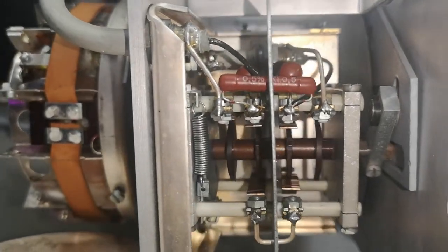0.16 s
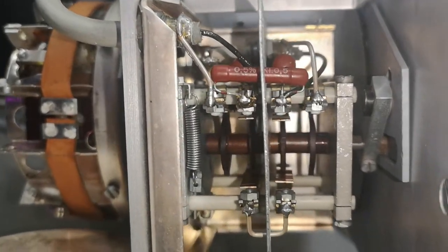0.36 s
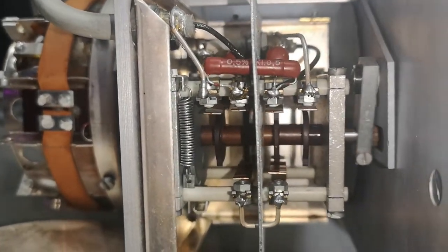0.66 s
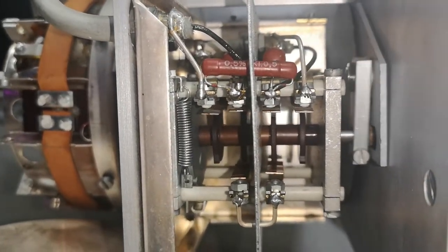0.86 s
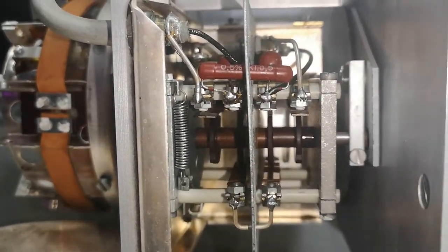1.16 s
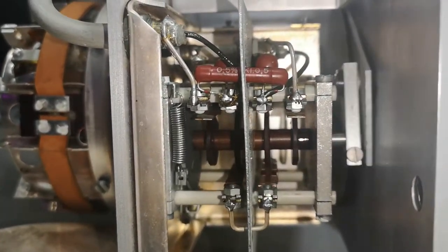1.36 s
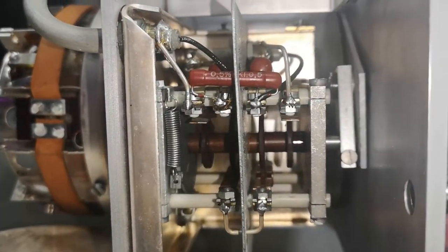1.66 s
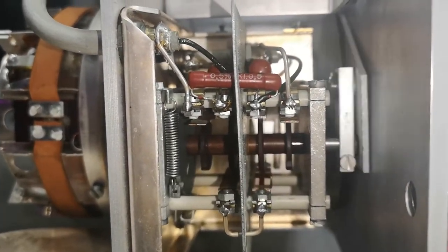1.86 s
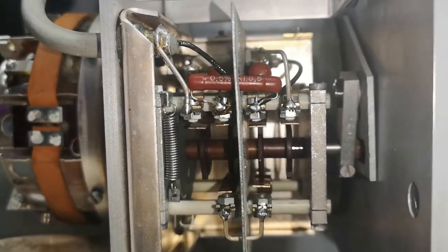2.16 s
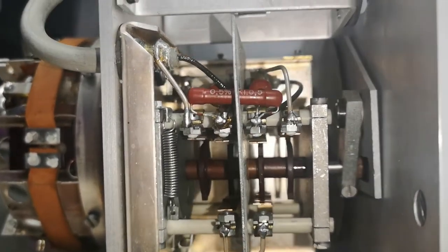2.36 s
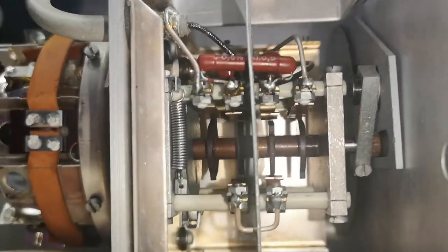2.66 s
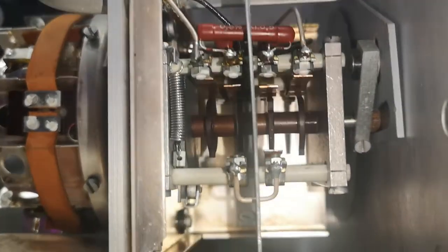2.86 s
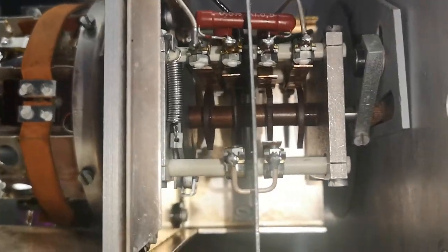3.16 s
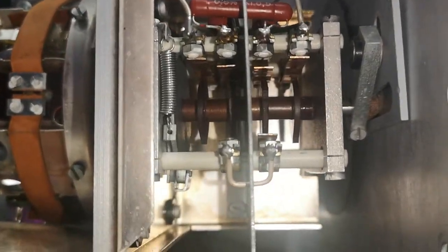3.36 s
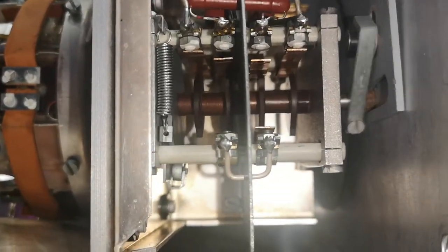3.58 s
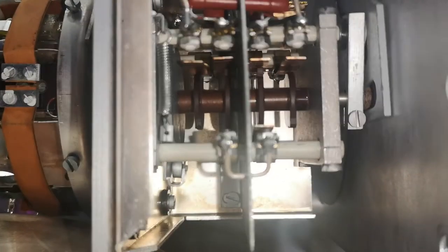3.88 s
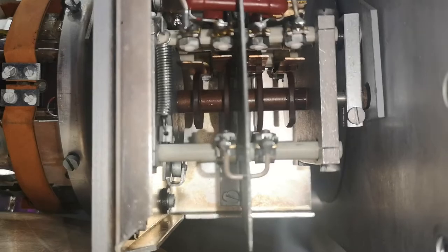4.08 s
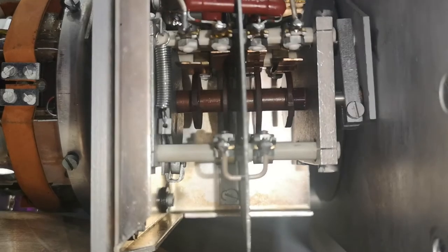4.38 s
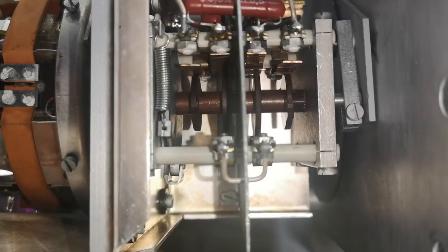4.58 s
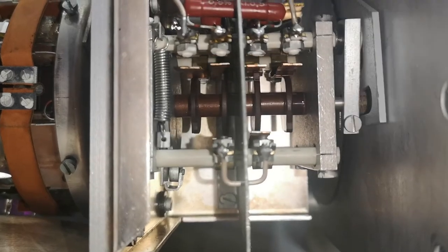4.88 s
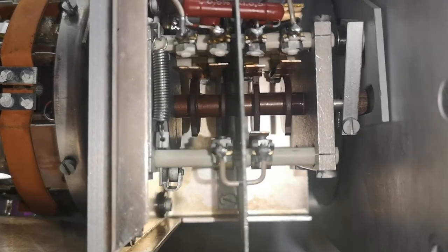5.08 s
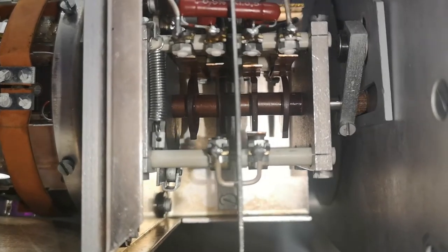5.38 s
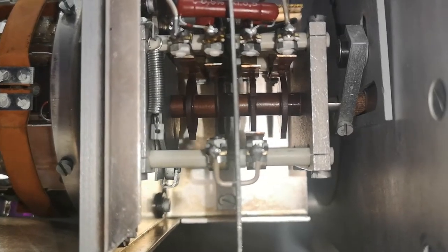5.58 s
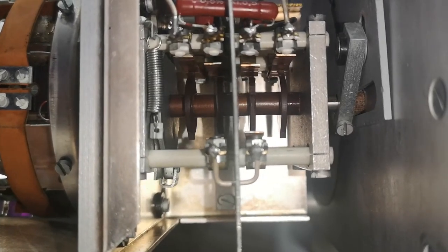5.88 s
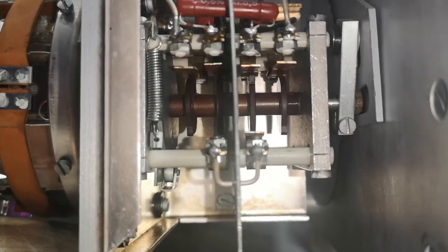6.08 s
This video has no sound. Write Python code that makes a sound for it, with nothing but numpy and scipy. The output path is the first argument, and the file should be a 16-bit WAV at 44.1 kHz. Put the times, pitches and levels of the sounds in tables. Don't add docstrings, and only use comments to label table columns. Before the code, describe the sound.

Close phone microphones catch a metal switch stepping through notches. Opening ring dies under small double clicks; a loud clank lands, then rubbing and chatter, then three more clanks about a second apart, the last also ringing brightly. Loose plates buzz shortly and a coil spring sings on. Short metallic chassis echo, quiet workshop air, low mains hum and dull hand rumble.

```python
import sys
import numpy as np
from scipy import signal
from scipy.fft import rfft, irfft, next_fast_len
from scipy.io import wavfile
from scipy.ndimage import uniform_filter1d, map_coordinates

SR = 44100
rng = np.random.default_rng(int(sys.argv[2]) if len(sys.argv) > 2 else 0)


def elevation(decibels):
    levels = np.asarray(decibels, float)
    return 10 ** (levels / 20)


def digitize_waveform(pressure):
    field = np.atleast_2d(pressure).T
    bounded = np.clip(field, -1, 1)
    quanta = np.round(bounded * 32767).astype(np.int16)
    wavfile.write(sys.argv[1], SR, quanta)


N = 274743

# start in seconds, blow in dB, thud in dB, ringing in dB,
# time in seconds when the next cam takes up the spring.
DETENTS = [
    (-.064, -12, -46, -35, 0.28),
    (1.5865, -10, -24.5, -35.5, 2.9),
    (3.2997, -11.5, -37, -29, 5.13),
    (4.5926, -10, -29, -35, 5.07),
    (5.6627, -13.5, -42, -29, 5.9),
]
# delay in seconds, level in dB,
# brightness in dB, panel boom in dB, t60 in seconds.
BOUNCES = [
    [(0, -8, -8, -24, 0.03), (.0035, -3.5, -10.5, -20, 0.045), (.009, -1.5, -10.5, -12.5, 0.028),
     (0.0146, -7.5, -2, -19.5, 0.026), (0.025, -13.5, -20, -19.5, .04)],
    [(0, -2.5, -10.5, -22.5, .023), (.003, 0.5, 3, -9.5, 0.022), (.007, -1.5, -4, -30.5, 0.017),
     (.012, -4.5, -8.5, -23.5, 0.028), (.02, -12.5, -14.5, -27.5, 0.065)],
    [(.001, -8.5, -12.5, -26, 0.037), (.0045, -4.5, -6.5, -20.5, 0.047), (.0115, -0.5, -8.5, -12.5, 0.026),
     (0.015, -5.5, -4, -18.5, .025), (0.025, -13, -19.5, -18, 0.05)],
    [(0, 3, -14, -20, 0.02), (.003, 0, 4.5, -14, 0.022), (.007, 2, -2.5, -24, 0.012),
     (.012, -8.5, -4, -28, 0.036), (.02, -13.5, -11, -29, 0.12)],
]
# start in seconds, level in dB, brightness in dB.
BLADE_BLOWS = [(0.209, -36, 1), (0.212, -34.5, -1.5), (0.221, -49, -5), (0.2388, -41.5, -7),
               (0.348, -42, 10), (0.351, -37.5, -13), (0.355, -35, -5), (0.3588, -34.5, -10),
               (0.369, -40.5, -10), (0.3733, -40, -13), (0.4105, -53, -7), (0.6369, -43, -11),
               (0.6394, -40, -2), (0.6477, -34, -9.5), (0.655, -44.5, -4), (0.66, -44.5, -11),
               (0.67, -42, -13), (0.687, -47, -13), (1.0853, -61, -17), (2.1345, -43.5, 4),
               (2.138, -36.5, -4.5), (2.144, -38.5, -4), (2.147, -40, -4), (2.154, -36.5, -7),
               (2.1599, -37, -9), (2.166, -37, -13), (2.176, -44, -15), (2.181, -42, -12),
               (3.6646, -40.5, -20.5), (3.691, -60, -13), (3.835, -38, 2), (3.8381, -36, -9),
               (3.848, -35.5, -7), (3.853, -34.5, -5), (3.858, -36.5, -5), (3.865, -35, -5.5),
               (3.872, -37.5, -13), (3.878, -40, -4), (4.1938, -48.5, -30), (5.0773, -41, -2),
               (5.086, -30.5, 0.5), (5.095, -34.5, 1), (5.1044, -34, 1), (5.113, -33, -8), (5.117, -34, -4),
               (5.126, -37.5, -6), (5.136, -39.5, -16), (6.006, -43, -16), (6.201, -33.5, 0),
               (6.207, -33, -8), (6.215, -37.5, -5), (6.222, -36.5, -3)]
# start in seconds, t60 of its blows in seconds, thud in dB, boom in dB.
TRIPS = [(0.206, 0.047, -26, -31), (.347, 0.043, -19, -22), (.632, 0.046, -18.5, -21),
         (1.085, 0.076, -16, -5.5), (2.133, 0.031, -21, -20.5), (3.664, 0.066, -29, -8),
         (3.834, 0.042, -28, -16), (4.191, 0.061, -11, -9.5), (5.077, 0.037, -20.5, -27),
         (6.005, 0.085, -23, -8), (6.2, 0.053, -43, -14.5)]
# start in seconds, end in seconds, level in dB, brightness in dB.
RUBS = [
    (0.542, 0.599, -77.5, 12),
    (2.043, 2.117, -67, 2),
    (2.116, 2.142, -36.5, -9),
    (3.648, 3.669, -47.5, -20),
    (3.79, 3.843, -53.5, -4),
    (4.415, 4.449, -82, -1.5),
    (5.015, 5.06, -67, 3),
    (5.063, 5.083, -42, -9),
    (6.138, 6.205, -63, 0),
]
# start in seconds, peak in dB, brightness in dB, t60 in seconds.
SLACK_TICKS = [(1.41, -85, 16.5, .08), (1.5575, -74.5, 28.5, 0.041), (1.576, -55, 2.5, 0.062),
               (2.0037, -60, 0.5, 0.19), (2.0406, -71, -3.3, .05), (2.39, -63, -8, 0.073),
               (2.896, -62.5, 0.5, 0.31), (2.9683, -61.5, -1.5, 0.047), (3.1915, -58, -2, 0.044),
               (3.8999, -47, -19, .055), (4.435, -65, -19.5, .08), (4.465, -58.5, 1, .027),
               (4.574, -55.5, 8, 0.043), (4.581, -57, 10.5, 0.044), (4.997, -65, 0, 0.077),
               (5.338, -58, -3.5, 0.079), (5.5541, -62, 20.5, 0.067), (5.9175, -55, -6.5, 0.26)]
# start in seconds, pitch in Hz, level in
# dB, t60 in seconds.
FLICKED_PARTS = [(-.05, 113, -32, 0.43), (-.05, 288, -44, 0.26), (.4, 504, -58, 0.81),
                 (.545, 5600, -66, 0.6), (1.556, 7100, -47.5, 0.034), (2.002, 5000, -46, 0.019),
                 (2.042, 5100, -53.5, .12), (2.135, 5300, -26, 0.059), (2.151, 2700, -28.5, 0.13),
                 (2.17, 370, -53.5, 0.42), (3.847, 2680, -35.5, 0.27), (5.105, 2627, -33.5, 0.18),
                 (5.19, 1950, -55, 0.14), (2.967, 8000, -67, 0.087), (3.791, 8300, -61, 0.079),
                 (3.79, 5000, -57, 0.092), (4.193, 2240, -41.5, 0.062), (4.2, 2780, -54, .12),
                 (4.467, 8960, -54, 0.046), (4.472, 2700, -62.5, 0.14), (5.137, 1034, -56, 0.64),
                 (5.921, 5600, -57, 0.1), (5.918, 8050, -57.5, 0.14), (6.023, 489, -57, 0.81),
                 (.211, 2320, -31, 0.086), (.211, 2960, -38, .1), (.211, 4530, -32, .05),
                 (.211, 5000, -31, 0.05), (0.21, 5480, -35, .05), (.356, 2524, -29, .1),
                 (0.351, 5230, -33, 0.08), (.648, 2370, -39, 0.11), (.648, 7400, -39, 0.056),
                 (5.087, 4900, -30, .08), (3.665, 2400, -43, 0.16), (6.006, 2500, -46, 0.11),
                 (5.665, 5080, -24, .04), (5.665, 5670, -28, .04), (2.9, 2770, -64, .07),
                 (3.19, 2800, -68.5, 0.079), (4.605, 756, -50.5, 0.52)]

SPRING_HZ = [491, 424, 1470]
COILS_HZ = [1954, 1967, 1946]
LOW_PLATE_HZ = [2422, 2498, 2600, 2701, 2895, 3349, 3812, 4253, 4390, 4636, 4867]
HIGH_PLATE_HZ = [5085, 5268, 5464, 5875, 6430, 6543, 6840, 7405, 7822, 7908, 8059, 8350, 8538, 9340]
# t60 in seconds, then level in dB
SPRING_MODES = [(1.26, -3, -3, -4.5, 1.0, -4), (0.21, -3, -5.5, -3, -22, -14),
                (0.38, -21, -19, -38.5, -25, -19.5)]
COIL_MODES = [(1.4, -6.0, 1, -6, -12, -9.5), (2.2, -15.5, -6, -24, -4.5, -24),
              (1.4, -7, -8.5, -13, -10.5, -7.5)]
PLATE_MODES = [(0.6, -13.5, -3, -19, -6.5, -13.5), (0.52, -55.5, -10.0, -47.5, -38, -51),
               (0.21, -32.0, -24.5, -5.5, -9, -25), (0.34, -20, -21.5, -13, -6, -15),
               (0.45, -15, -45, -17.5, -15.5, -9.5), (0.4, -17, -42, -10, -47, -21),
               (0.55, -28, -17.5, -16.5, -41.5, -20), (0.25, -34.5, -8, -15.0, -40.5, -23),
               (0.55, -19, -26, -17.5, -18.5, -30), (0.4, -32, -22, -15, -43, -21),
               (0.3, -40.0, -24, -35, -33, -24),
               (0.45, -38.5, -18.5, -31.5, -23.5, -45), (0.59, -52, -14, -21.0, -23.5, -49.0),
                (0.25, -30.0, -14.5, -12.5, -37.5, -17), (0.55, -56.0, -32.0, -18.5, -27.5, -56),
                (0.3, -31.0, -16, -16.0, -35.5, -48), (0.4, -51.5, -31.0, -14.5, -25.5, -33),
                (0.3, -26, -31, -34.5, -33.5, -12), (0.4, -35, -49.0, -41.0, -46.0, -33),
                (0.25, -24.0, -34.5, -14.0, -34, -6.5), (0.45, -35.5, -28.5, -13.5, -14, -11),
                (0.51, -55.0, -22, -20.0, -40.5, -28), (0.4, -11.5, -56.5, -19.5, -24, -22),
                (0.3, -42.0, -31, -19.0, -36, -29.5), (0.52, -46.5, -37.5, -21.5, -46.0, -22)]

# pitch in Hz, level in dB, t60 in seconds.
CASE_MODES = [(113, 0.5, 0.38), (160, -9, 0.35), (191.5, -8.5, 0.24), (312, -6.5, 0.049)]
# pitch in Hz, width in Hz, level in dB.
FRAME = [(1713, 1100, -10.5), (1918, 249, 3), (2505, 220, 1.5), (2700, 80, 7), (3500, 2100, -7.5)]
# pitch in Hz, width in Hz, level in dB.
SHELL = [(4470, 33, -9), (5100, 1100, 5), (5300, 9.7, 8), (6880, 780, -10), (7600, 810, -3.5),
         (8300, 120, 3.5), (8320, 1800, -1), (13300, 4700, -15)]
# pitch in Hz, width in Hz, level in dB.
PANELS = [(244, 320, -3.5), (426, 108, 7.5), (866, 100, -13.5)]
# pitch in Hz, t60 in seconds.
ECHO_T60 = [(300, 0.45), (1800, 0.34), (2600, 0.42), (5000, 0.37), (8000, 0.38), (11000, 0.18),
            (15000, 0.21)]
# pitch in Hz, level in dB.
ECHO_TINT = [(300, 6.5), (1000, 6.5), (2500, -4.5), (5000, -5), (8000, -7.5), (12000, 2)]

# pitch in Hz, level in dB rms.
HUM_LINES = [(100, -69.5), (120, -68.5)]
# pitch in Hz, level in dB per Hz.
AIR = [(35, -71), (60, -24.5), (85, -3.5), (108, -6.5), (153, -19), (250, -17), (315, -17.5), (363, -20),
       (389, -26.5), (437, -22.5), (882, -33.5), (2090, -27), (4030, -36), (8120, -41.5), (16000, -60.5)]
# pitch in Hz, level in dB per Hz.
GRIP = [(7.1, -38.5), (12, -4), (43, 1.5), (75, -10.5), (108, -4), (130, -8.5), (170, -39), (290, -120)]
# time of the peak in seconds, peak in dB.
JOLTS = [(0, -46), (.38, -79), (.71, -64), (1.659, -43.5), (2.13, -47), (2.381, -72), (2.55, -67),
         (2.782, -56.5), (3.2, -50), (3.38, -47.5), (3.66, -43), (3.891, -37.5), (4.12, -56), (4.42, -49),
         (4.62, -46), (4.74, -46), (5.081, -46.5), (5.86, -65), (6.07, -60), (6.21, -45.5)]
# pitch in Hz, likeness from 0 to 1, lag in radians, left-right in dB.
PORTS = [(120, 0.98, 0, 2), (210, 0.78, 0.73, 0), (337.4, 0.99, 1.28, 1), (470, 0.96, 1.75, 0.5),
         (790, 0.27, 2.5, 1), (1030, 0.39, 1, -1.5), (1535, 0.93, 1.5, -1.5), (2026, 0.57, 3, 1),
         (2330, 0.34, 1.5, 2.5), (5000, 0.28, 2.5, -0.4), (8000, 1, 0.66, 2.1), (14400, 0.47, 0.24, -1.2)]


def unit(x):
    return x / np.sqrt(np.mean(x ** 2) + 1e-20)


def along(points, hz, col=1):
    rows = np.array(points)
    return np.interp(np.log(hz + 1), np.log(rows[:, 0] + 1), rows[:, col])


def filtered(x, response):
    m = next_fast_len(N + SR // 2)
    return irfft(rfft(x, m) * response(np.fft.rfftfreq(m, 1 / SR)), m)[..., :N]


def resonances(peaks):
    def response(f):
        total = 0
        for k, (hz, width, db) in enumerate(peaks):
            damping = 1j * f * width
            total = total + (-1) ** k * elevation(db) * damping / (hz * hz - f * f + damping)
        return total
    return response


def add(track, s, sound):
    i = round(s * SR)
    part = track[..., max(i, 0):i + sound.shape[-1]]
    part += sound[..., max(-i, 0):][..., :part.shape[-1]]


def ringing(hz, db, t60, t):
    start, rate, shift = rng.uniform(0, 1, 3)
    waver = 0.00016 * hz * np.sin(2 * np.pi * ((6 + 12 * rate) * t + shift))
    phase = 2 * np.pi * (hz * t + start) + waver + [[0], [np.pi / 2]]
    onset = 1 - np.exp(-t / 0.00038)
    return elevation(db - 60 * t / t60) * np.sin(phase) * onset


def ringing_modes(pitches, modes, detent, db, t):
    return sum(ringing(hz, db + levels[detent], t60, t) for hz, (t60, *levels) in zip(pitches, modes))


def spring_and_plates():
    out = np.zeros((2, N))
    t = np.arange(round(.6 * SR)) / SR
    delays_s = 0.0037, 0.025
    settle_s, coil_settle_db, plate_settle_db = .19, -8.5, -4
    coil_free_s = 0.51
    settled = 1 / (1 + np.exp((settle_s - t) / 0.0034))
    for k, (s, _, _, db, stop) in enumerate(DETENTS):
        unloaded = 1 / (1 + np.exp((t + s - stop) / 0.022))
        apart = 1 / (1 + np.exp((t - coil_free_s) / 0.047))
        spring = ringing_modes(SPRING_HZ, SPRING_MODES, k, db, t)
        coils = elevation(coil_settle_db * settled) * apart * ringing_modes(COILS_HZ, COIL_MODES, k, db, t)
        plates = ringing_modes(LOW_PLATE_HZ + HIGH_PLATE_HZ, PLATE_MODES, k, db, t)
        plates = elevation(plate_settle_db * settled) * plates
        add(out, s + delays_s[k % 2], unloaded * (spring + coils) + plates)
    return out


def flicked_parts():
    out = np.zeros((2, N))
    t = np.arange(round(.6 * SR)) / SR
    for s, hz, db, t60 in FLICKED_PARTS:
        add(out, s, ringing(hz, db, t60, t))
    return out


def echo(pair):
    out = np.zeros((2, N))
    step = SR // 3
    for i in range(0, N, step):
        hz, t, z = signal.stft(rng.standard_normal((2, SR // 2)), SR, nperseg=256)
        settle_db = -6 / (1 + np.exp((.18 - t) / 0.0076))
        tint_db = along(ECHO_TINT, hz)[:, None]
        decay_db = -60 * t / along(ECHO_T60, hz)[:, None]
        tail = signal.istft(z * elevation(tint_db + decay_db + settle_db), SR, nperseg=256)[1]
        norm = np.linalg.norm(tail[0])
        add(out, i / SR + 0.0052, signal.fftconvolve(pair[:1, i:i + step], tail / norm, axes=1))
        if i == 0:
            remnant = filtered(tail, resonances(FRAME + SHELL))[:, :SR // 2]
            add(out, -.095, elevation(15.5) * remnant / norm)
    return out


def room():
    z = signal.stft(rng.standard_normal((2, N)), nperseg=512)[2]
    field = uniform_filter1d(rng.standard_normal(z.shape[1:]), 6, 0)
    patches = unit(uniform_filter1d(field, 14, 1))
    pair = signal.istft(z * elevation(1.6 * patches), nperseg=512)[1][:, :N]
    return elevation(-69.5 + 5.5) * unit(filtered(pair, lambda f: elevation(along(AIR, f))))


def hum():
    t = np.arange(N) / SR

    def drift():
        return map_coordinates(rng.standard_normal(40), [t * 5])

    return sum(elevation(db + 5.0 + 1.4 * drift()) * np.sin(2 * np.pi * hz * t + 0.18 * drift())
               for hz, db in HUM_LINES)


def hand_gain(t):
    rest_db, rise_db_per_s, fall_db_per_s = -66, 220.5, 101.5
    power = elevation(rest_db) ** 2
    for s, db in JOLTS:
        late = t - s
        slope_db = np.where(late < 0, rise_db_per_s * late, -fall_db_per_s * late)
        power = power + elevation(db + slope_db) ** 2
    return np.sqrt(power)


def hand_rumble():
    noise = rng.standard_normal((2, N))
    both, apart = unit(filtered(noise, lambda f: elevation(along(GRIP, f))))
    return hand_gain(np.arange(N) / SR) * (both + elevation(-29) * apart * [[1], [-1]])


def blade_blows():
    hits, thuds = [], []
    drive_db, bright_drive_db = 5, -5
    for s, db, bright_db in BLADE_BLOWS:
        _, t60, thud_db, boom_db = [trip for trip in TRIPS if trip[0] < s + .01][-1]
        hits.append((s, db + drive_db, bright_db + bright_drive_db, boom_db, t60))
        thuds.append((s, db + drive_db + thud_db))
    return hits, thuds


def slack_blows():
    thud_db, boom_db = -13, -13.5
    hits = [(s, db, bright_db, boom_db, t60) for s, db, bright_db, t60 in SLACK_TICKS]
    thuds = [(s, db + thud_db) for s, db, _, _ in SLACK_TICKS]
    return hits, thuds


def roller_blows():
    hits, thuds = [], []
    thud_delays_s = 0.025, .016
    for k, (s, db, thud_db, _, _) in enumerate(DETENTS):
        if k == 0:
            continue
        for late, step_db, *rest in BOUNCES[k - 1]:
            hits.append((s + late, db + step_db, *rest))
        thuds.append((s + thud_delays_s[k % 2], thud_db))
    return hits, thuds


def all_blows():
    sources = [blade_blows(), slack_blows(), roller_blows()]
    return sum((hits for hits, _ in sources), []), sum((thuds for _, thuds in sources), [])


def contact_pushes(hits):
    low, high, deep = np.zeros((3, N))
    t = np.arange(SR // 8) / SR
    for s, db, bright_db, boom_db, t60 in hits:
        push = elevation(db - 60 * t / max(t60, .004)) * (1 - np.exp(-t / 0.0003))
        add(low, s - .0008, push)
        add(high, s - .0008, elevation(bright_db) * push)
        add(deep, s, elevation(boom_db) * push)
    for start, end, db, bright_db in RUBS:
        swell = np.linspace(.3, 1, round((end - start) * SR))
        add(low, start, elevation(db) * swell)
        add(high, start, elevation(db + bright_db) * swell)
    return low, high, deep


def dull(f, hz):
    return 1 / (1 + 1j * f / hz) ** 2


def clanks(hits):
    low, high, deep = contact_pushes(hits)
    fine = uniform_filter1d(rng.standard_normal(N), 30) * np.sqrt(30)
    coarse = unit(uniform_filter1d(rng.standard_normal(N), size=130))
    grit = unit(elevation(2.0 * fine + 1.2 * coarse))
    rough = grit * rng.standard_normal((3, 2, N))

    def frame(f):
        return resonances(FRAME)(f) * dull(f, 4420) ** 2 * (1 - dull(f, 1600)) ** 2

    def shell(f):
        return resonances(SHELL)(f) * dull(f, 21000) * (1 - dull(f, 3100))

    def panels(f):
        return resonances(PANELS)(f) * dull(f, 1400)

    clank = elevation(12) * filtered(low * rough[0], frame)
    clank += elevation(5.0) * filtered(high * rough[1], shell)
    clank += elevation(17.5) * filtered(deep * rough[2], panels)
    return elevation(-1.5) * clank


def case_thuds(thuds):
    impulses = np.zeros(N)
    for s, db in thuds:
        impulses[round(s * SR)] += elevation(db)
    t = np.arange(SR // 2) / SR
    body = sum(elevation(db - 60 * t / t60) * np.sin(2 * np.pi * hz * t) for hz, db, t60 in CASE_MODES)
    body = body * (1 - np.exp(-t / 0.0022))
    return signal.fftconvolve(impulses, body)[:N]


def finger_tap():
    s, db, hz = 2.537, -43, 146
    late = np.arange(N) / SR - s
    return -elevation(db) * np.exp(-(late * hz * 3) ** 2) * np.cos(2 * np.pi * hz * late)


def ports(pair, blur=1):
    def like(f):
        return np.clip(along(PORTS, f), 0, .97) ** blur

    def tilt(f):
        return elevation(along(PORTS, f, col=3) / 2)

    def to_right(f):
        lag = np.exp(-1j * along(PORTS, f, col=2))
        return np.array([like(f) * lag, np.sqrt(1 - like(f) ** 2)]) / tilt(f)

    left = filtered(pair[0], tilt)
    right = filtered(pair, to_right).sum(axis=0)
    return np.array([left, right])


def scene():
    hits, thuds = all_blows()
    clank = clanks(hits)
    switch = clank + elevation(-12) * echo(clank) + spring_and_plates() + flicked_parts() + case_thuds(thuds)
    bass = hum() + hand_rumble() + finger_tap()
    return ports(switch) + ports(room(), blur=0.77) + bass


def band_limit(x):
    return signal.sosfilt(signal.butter(12, 16500, fs=SR, output="sos"), x)


def record(dry):
    soft = dry / (1 + np.abs(dry / 1.05) ** 4) ** (1 / 4)
    hiss = elevation(-83.5) * rng.standard_normal(N)
    top_hz = 15780
    mix = filtered(soft + hiss, lambda f: 1 / (1 + (f / top_hz) ** 400))
    return band_limit(mix)


dry = scene()
out = record(dry)
digitize_waveform(out)
```